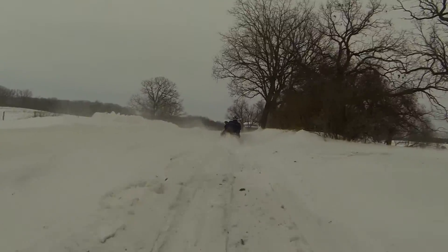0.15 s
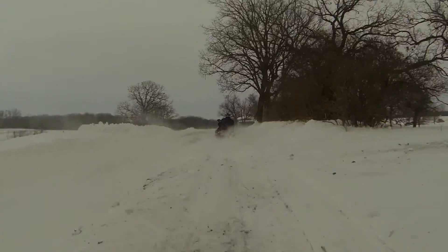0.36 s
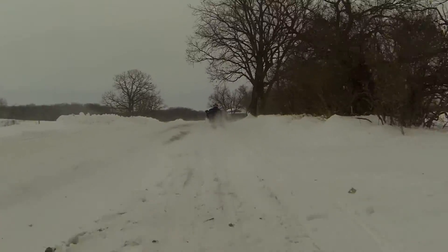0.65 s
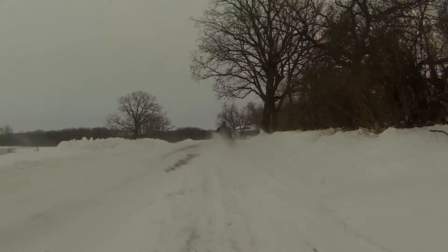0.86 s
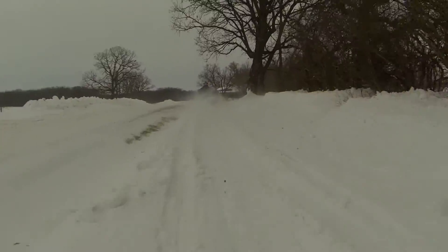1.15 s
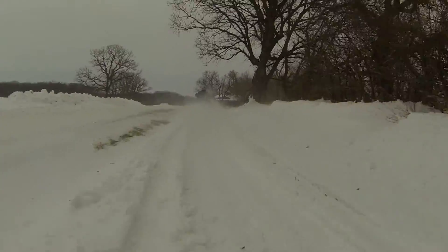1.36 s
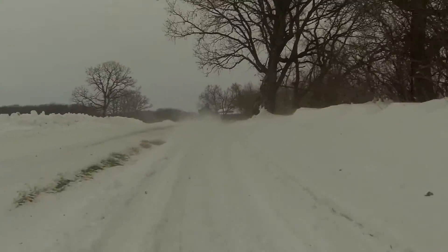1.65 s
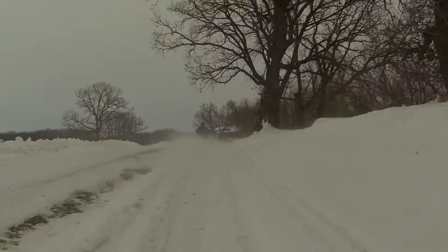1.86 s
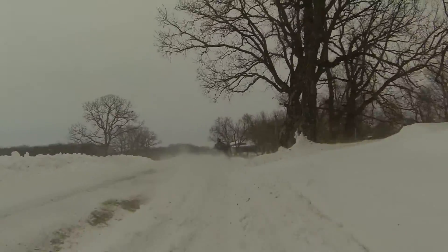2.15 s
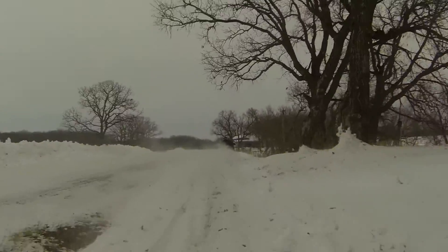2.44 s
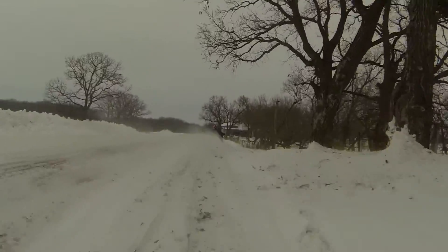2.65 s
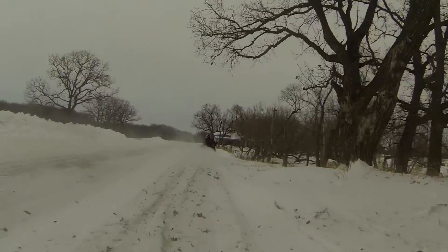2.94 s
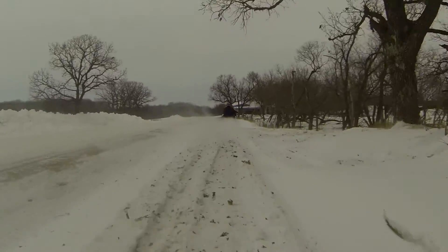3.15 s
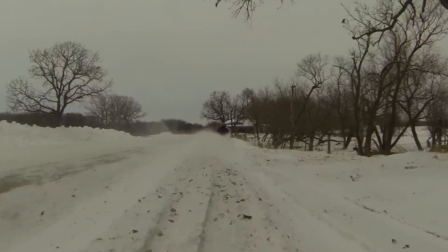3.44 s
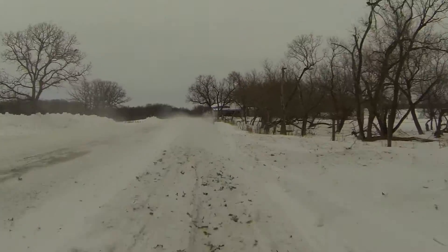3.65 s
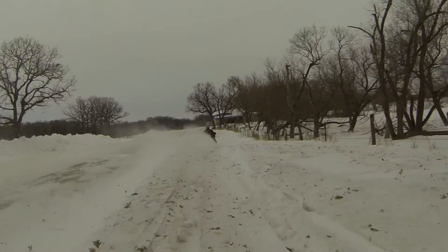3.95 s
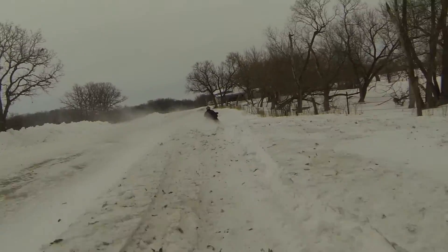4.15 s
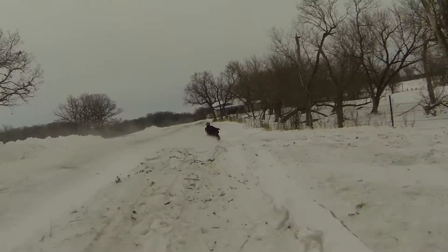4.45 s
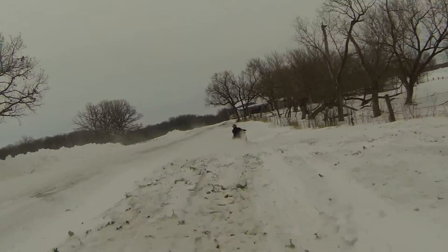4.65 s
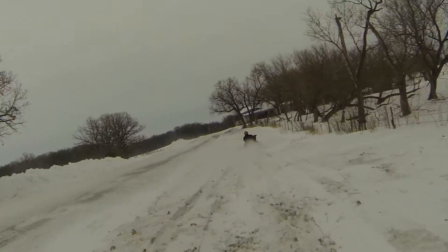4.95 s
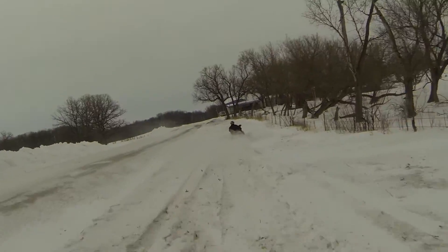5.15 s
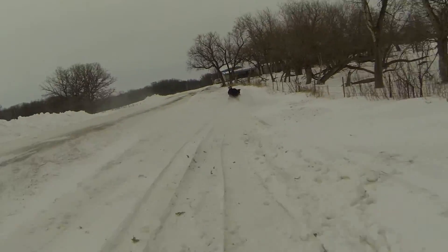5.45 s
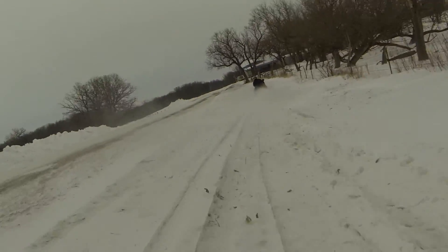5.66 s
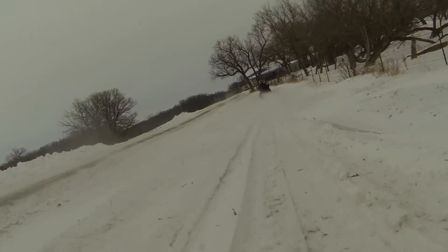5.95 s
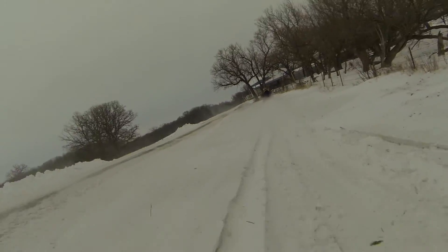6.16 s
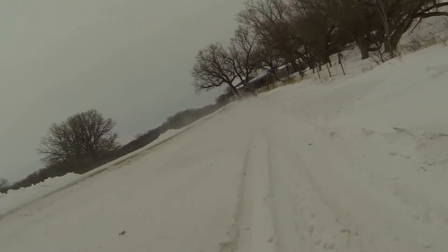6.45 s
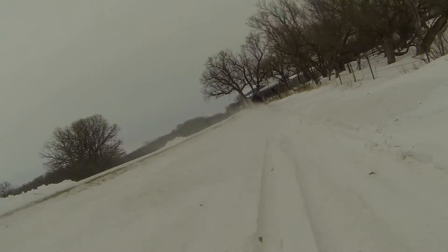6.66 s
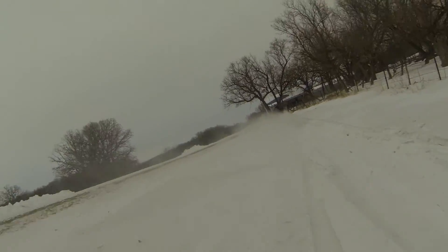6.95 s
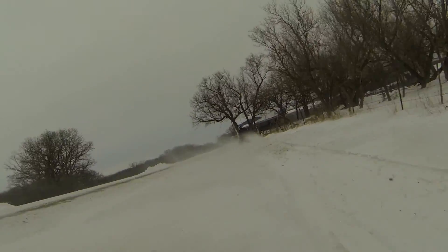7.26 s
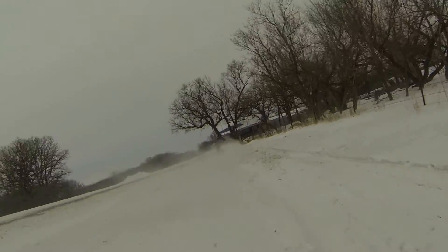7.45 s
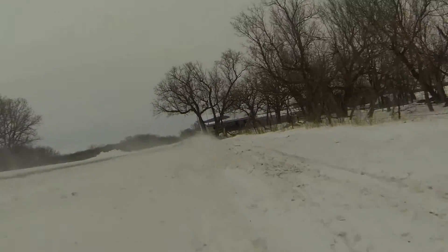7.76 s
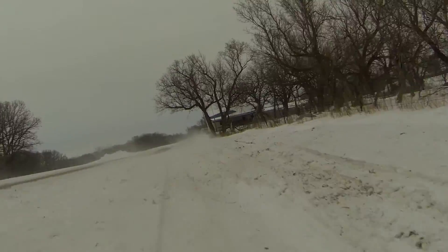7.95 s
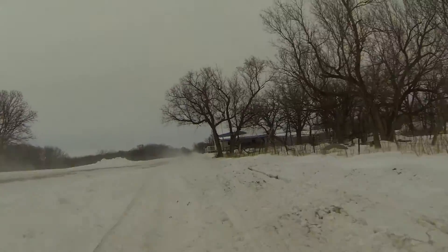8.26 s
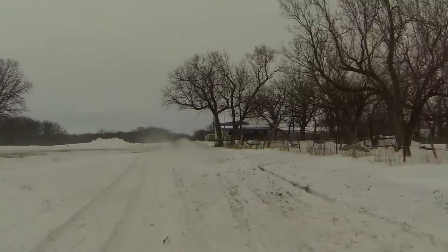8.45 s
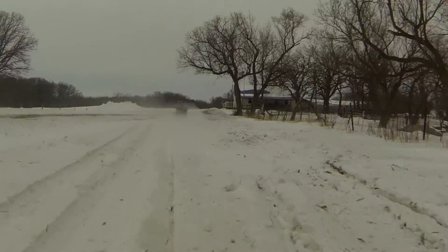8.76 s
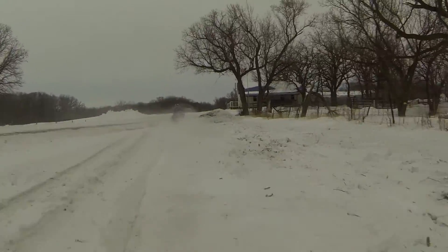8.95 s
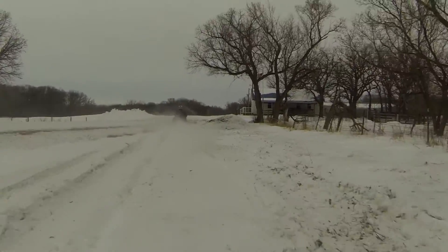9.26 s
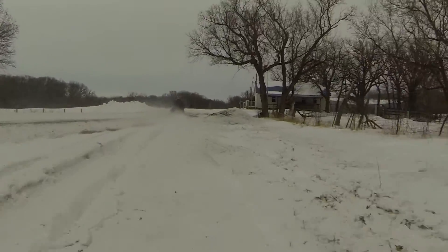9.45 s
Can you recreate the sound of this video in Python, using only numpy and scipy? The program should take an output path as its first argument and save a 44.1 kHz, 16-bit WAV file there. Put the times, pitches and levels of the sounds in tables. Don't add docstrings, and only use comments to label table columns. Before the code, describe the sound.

A fast snowmobile is heard from on board, through a sealed housing that makes everything boxy, nasal and resonant. From 0 s the raspy two-stroke engine is under way, each throttle pull raising its pitch before it settles; pulls near 0.6, 1.6 and 2 s climb progressively higher. Track rumble, spray hiss and a deep swinging throb near 55 Hz run throughout, with a faint low buzz around 1 to 2 s. Dull ski knocks and sharp little latch ticks scatter irregularly, crowded around 4.1 to 4.7 s. The engine sags near 4.8 s, then builds in steps from 5 to 6.5 s. At about 7.1 s rumble thins, and the highest, clearest whining revs hold until 7.8 s amid rapid ticking. It drops quickly by 8.2 s into a weaker, lower growl. From about 8.7 s the roar pulses evenly, five or six surges a second, revving again to the end, cut off while running.

```python
import sys
import numpy as np
from scipy import signal
from scipy.fft import rfft, irfft, next_fast_len
from scipy.io import wavfile
from scipy.ndimage import uniform_filter1d

SR = 44100
rng = np.random.default_rng(int(sys.argv[2]) if len(sys.argv) > 2 else 0)


def output_pcm(signal):
    pcm = np.clip(np.atleast_2d(signal).T, -1, 1) * 32767
    wavfile.write(sys.argv[1], SR, np.round(pcm).astype(np.int16))


def level_to_linear(level):
    exponent = np.asarray(level, float) / 20
    return 10 ** exponent


N = 423801

# lower, upper in turns per s.
TOP_HZ = (114, 124)
# fully sunk, clear of it, in turns per s.
SLOW_HZ = (88, 102)


def engine():
    s = coarse_s()
    speed, pull = crank(s)
    effort_db = load(s) + 23
    turns = np.cumsum(fine(speed) * (1 + .0004 * drift(12))) / SR
    clean_db = 5.5 + 3 * np.maximum(np.tanh(pull / 24), -.3) + .3 * effort_db
    clean_db = clean_db + 4 * np.interp(speed, TOP_HZ, [0, 1])
    shake = frame_shake(turns, speed, effort_db)
    rumble = track_rumble(turns, speed, pull, effort_db, clean_db)
    return shake + rumble + exhaust(turns, speed, pull, effort_db, clean_db)


def exhaust(turns, speed, pull, effort_db, clean_db):
    # frequency in Hz, level in dB per Hz.
    hiss_curve = [(2240, -33), (3800, 1), (4150, -5.5), (4810, -2.5), (5350, -8), (6450, -10),
                  (6960, -12.5), (7970, -10), (9240, -23.5), (13900, -29.3), (14600, -31), (14950, -75)]

    def hiss_at(hz):
        return at_hz(hiss_curve, hz)

    gusts = gusty_noise(turns, gate=0.14, patchy_db=1.0, rate=23)
    drop_db = 6 * np.clip(-pull / 70, 0, 1)
    lines, power = orders(turns, speed, clean_db - drop_db, range(8, 28), cavity_db, waver_db=2.5, smear=.2)
    roar_db = fine(effort_db) - 23
    roar = coloured(gusts, cavity_db) + lines
    roar *= level_to_linear(roar_db) / np.sqrt(band_rms(cavity_db, 1100, 3500) ** 2 + power)

    spray_db = -2.5 * np.tanh(pull / 40)
    hiss_db = fine(-51.5 + .78 * effort_db + .04 * (speed - 95) + spray_db)
    hiss = coloured(gusts, hiss_at) / band_rms(hiss_at, 4200, 9000)
    sizzle = signal.sosfilt(signal.butter(2, 9000, "high", fs=SR, output="sos"), hiss)
    hiss += np.clip(0.07 * (roar_db + 25), -.3, 1) * sizzle
    return roar + level_to_linear(hiss_db) * hiss


def track_rumble(turns, speed, pull, effort_db, clean_db):
    # frequency in Hz, level in dB per Hz.
    rumble_curve = [(12, -29), (20, -11), (43, -9), (69, -3.5), (84, -16), (108, -16.5), (145, -23),
                    (215, -12), (274, -22), (334, -17), (406, -23.5), (471, -33.5), (822, -35.5),
                    (921, -46), (1000, -43.5), (1300, -70.5), (2200, -120)]
    # time in seconds, added rumble in dB.
    grip = [(0, 2.5), (.55, 3.5), (1.0, 0), (1.55, 2), (2.19, -5), (2.36, 4), (3.0, -2.5), (3.9, 1.5),
            (4.15, -1), (4.9, 3), (5.3, -2), (7.04, -3.5), (7.13, -13), (7.8, -7.5), (7.96, 2),
            (8.08, -4.5), (9.1, .5), (9.61, -3)]

    def rumble_at(hz):
        return at_hz(rumble_curve, hz)

    grip_db = in_time(grip)[0]
    slack_db = 5 * np.clip(.5 - pull / 24, 0, 1) * np.interp(speed, SLOW_HZ, [1, .3])
    lines, power = orders(turns, speed, clean_db - slack_db, range(2, 9), rumble_at, waver_db=2.5, smear=.4)
    rumble = coloured(gusty_noise(turns, gate=0.081, patchy_db=1.5, rate=21), rumble_at) + lines
    level_db = fine(-27 + .76 * effort_db) + grip_db
    rumble *= level_to_linear(level_db) / np.sqrt(band_rms(rumble_at, 140, 480) ** 2 + power)
    by_air = signal.sosfiltfilt(signal.butter(2, 450, "high", fs=SR, output="sos"), rumble)
    return rumble - by_air + by_air * level_to_linear(-.5 * grip_db)


def frame_shake(turns, speed, effort_db):
    # centre in seconds, depth in dB, half length in seconds.
    floats = [
        (.76, 4, .15),
        (2.31, 4, .1),
        (4.54, 5, .2),
        (4.91, 5, .1),
        (5.31, 9, .12),
        (7.42, 15, .38),
        (8.2, 18, .27),
        (9.3, 3, .3),
    ]
    # time in seconds, level in dB.
    buzz_curve = [
        (.7, -50),
        (.85, -29),
        (1.75, -28),
        (2.05, -45),
    ]
    first_db = fine(-27 - .36 * (speed - 95) + .2 * effort_db) - dips(floats)
    first_db = first_db + .3 + 3.5 * drift(6)
    first = np.sqrt(2) * level_to_linear(first_db) * np.sin(2 * np.pi * turns + drift(10) / 2)
    buzz_level = np.sqrt(2) * level_to_linear(in_time(buzz_curve)[0] + 2 * drift(10))
    return first + buzz_level * np.sin(2 * np.pi * 176 * np.arange(N) / SR + 1.5 * drift(4))


def orders(turns, crank_hz, throttle_db, numbers, db_at, waver_db, smear):
    loaded_db = [-2, 4, 1, -11, 3, -3, -6, -6, -3, -5, 3, -2, 1, 2, -3, -2, -2, -2, -1, 1, 0, -2, -2, -3,
                 -5, -6]
    top_db = [-17, -2, -6, -14, -4, -10, -3, -5, -9, 4, 4, -10, -2, 7, 6, -6, -5, -5, -6, -12, -7, -5, -11,
              -2, -4, -11]
    top = np.interp(crank_hz, TOP_HZ, [0, 1])
    sunk_db = np.interp(crank_hz, SLOW_HZ, [7, 0])
    out, power = np.zeros(N), 0
    for k in numbers:
        order_db = (1 - top) * loaded_db[k - 2] + top * top_db[k - 2] - (k < 4) * sunk_db
        level = level_to_linear(db_at(k * crank_hz) + order_db + throttle_db) * np.sqrt(30 / SR)
        power = power + level ** 2
        height = fine(np.sqrt(2) * level * level_to_linear(waver_db * coarse_drift(10)))
        out += height * np.sin(2 * np.pi * (k * turns + rng.random()) + smear * drift(5.1))
    return out, fine(power)


def crank(s):
    # opens in seconds, crank turns per s then, eases in seconds,
    # turns per s then, settling time constant in seconds.
    pulls = np.array([(-.3, 70, -.03, 80.5, .2), (.51, 73.4, .79, 89.5, .06), (.93, 85.6, 1.07, 86.7, .3),
                      (1.38, 81.8, 1.45, 83.4, 2), (1.46, 83.8, 1.78, 99.3, 2),
                      (1.98, 106, 2.18, 117.3, .13), (2.42, 100.3, 2.43, 100.2, 3),
                      (2.82, 93, 3.02, 98.5, 2), (3.03, 99, 3.19, 108.6, .06), (3.49, 97, 3.78, 110.2, .28),
                      (4.87, 80.6, 5.17, 97.2, .07), (5.31, 89.3, 5.38, 90, .3), (5.64, 87, 6.08, 105.5, 2),
                      (6.3, 111.2, 6.52, 117.4, .1), (6.8, 104, 6.93, 109.4, 2), (7.24, 126, 7.32, 130, 2),
                      (7.45, 132.9, 7.46, 133, .2), (7.67, 134.3, 7.77, 134.8, .4),
                      (8.25, 97.4, 8.26, 97.2, 3), (9.0, 87.5, 9.41, 100.6, 1), (9.7, 92.5, 10, 100, 1)])
    now = np.searchsorted(pulls[:-1, 0], s) - 1
    opens, low, eases, high, settle = pulls[now].T
    next_s, next_low = pulls[now + 1, :2].T
    settled = np.expm1(-np.maximum(s - eases, 0) / settle) / np.expm1(-(next_s - eases) / settle)
    climbed = np.minimum((s - opens) / (eases - opens), 1)
    speed = low + (high - low) * climbed + (next_low - high) * settled
    flywheel_s = .07
    speed = uniform_filter1d(speed, int(flywheel_s * SR / 40), mode="nearest")
    return speed, np.gradient(speed, s)


def load(s):
    # time in seconds, exhaust roar in dB, seconds to swell 10 dB, seconds to fade 10 dB.
    surges = [(.15, -20, .19, .17), (.35, -25, .3, .4), (.51, -23, .11, .25), (.73, -20.5, .18, .3),
              (1.0, -22, .9, .08), (1.36, -19.5, .24, .07), (1.56, -19, .17, .9), (1.96, -14.5, .9, .33),
              (2.39, -18.5, .9, .32), (2.75, -22.5, .6, .32), (3.06, -15.5, .16, .13),
              (3.24, -17.5, .15, .29), (3.65, -15, .45, .7), (4.025, -19.5, .9, .07), (4.38, -20, .35, .14),
              (4.55, -22.5, .25, .12), (4.68, -18.5, .1, .16), (4.99, -18.5, .25, .15), (5.18, -24, .9, .1),
              (5.39, -25.5, .15, .5), (5.99, -15.5, .3, .14), (6.14, -17, .3, .16), (6.36, -16.5, .3, .9),
              (6.49, -16.5, .9, .09), (6.91, -14.5, .19, .08), (7.05, -20, .4, .22), (7.5, -19, .25, .9),
              (7.95, -20.5, 3, .065), (8.15, -28, .18, .9), (8.42, -24, .16, .4)]
    # first surge in seconds, period in seconds, roar in dB,
    # seconds to swell 10 dB, seconds to fade 10 dB.
    washboard = (8.72, .178, -21.5, .2, .17)
    first, period, *shape = washboard
    steady = [(first + k * period, *shape) for k in range(7)]
    rows = np.array([(-1, -60, 1, 1)] + surges + steady)
    coming = np.searchsorted(rows[:, 0], s)
    was_s, was_db, _, fade = rows[coming - 1].T
    at, db, swell, _ = rows[coming].T
    fading = was_db - 10 * (s - was_s) / fade
    swelling = db - 10 * (at - s) / swell
    return uniform_filter1d(np.maximum(fading, swelling), size=11)


def gusty_noise(turns, gate, patchy_db, rate):
    beat = np.cos(2 * np.pi * turns) + .6 * np.cos(6 * np.pi * turns)
    return rms_one(rng.standard_normal(N) * (1 + gate * beat) * level_to_linear(patchy_db * drift(rate)))


def cavity_db(hz):
    # frequency in Hz, level in dB per Hz.
    roar_curve = [(500, -59.5), (850, -19), (910, -30.5), (1000, -22.5), (1140, -13), (1270, -2.5),
                  (1420, 1.5), (1610, -0.5), (1830, -13.5), (1930, -14), (2320, -8.5), (2690, -15),
                  (3060, -14.5), (3580, -24.5), (4100, -52), (4300, -36.5), (5590, -63), (9460, -120)]
    # frequency in Hz, width in Hz, height in dB.
    resonances = [(1946, 58, 7.5), (2275, 36, 5), (2700, 70, -2), (3492, 43, 8.5)]
    peaks = sum(db / (1 + (2 * (hz - mid) / width) ** 2) for mid, width, db in resonances)
    return at_hz(roar_curve, hz) + peaks


def mount():
    # time in seconds, frequency in Hz.
    swing_hz = [(0, 56), (.9, 55), (1.5, 57), (1.92, 53.5), (2.22, 60), (2.45, 56), (3.15, 52), (3.75, 57),
                (4.05, 52), (4.38, 52), (4.5, 58.4), (4.85, 58), (5.05, 55.8), (6.3, 54.8), (6.7, 51.5),
                (7.15, 53.6), (7.6, 59), (8.2, 56)]
    # time in seconds, level in dB.
    swing_db = [(0, -20), (.4, -17.5), (1.5, -18.5), (2.1, -14.5), (2.9, -15.5), (3.36, -14.5), (3.9, -20),
                (4.05, -12.5), (4.3, -17), (4.74, -11), (5.2, -14), (5.9, -16.5), (6.05, -13), (7.0, -15),
                (7.6, -9.5), (7.95, -14.5), (9.05, -17.5), (9.61, -11)]
    # time in seconds, depth in dB, half length in seconds.
    checks = [(.08, 16, .25), (1.3, 17, .09), (1.66, 7, .15), (2.17, 12, .06), (2.33, 22, .11),
              (2.93, 9, .1), (3.2, 11, .12), (3.61, 13, .18), (4.14, 7, .09), (4.36, 15, .06),
              (4.66, 30, .1), (4.85, 14, .09), (5.97, 16, .06), (6.08, 10, .06), (6.34, 9, .2),
              (6.8, 14, .17), (7.36, 12, .07), (7.47, 14, .06), (7.59, 18, .05), (7.7, 13, .06),
              (7.81, 21, .05), (8.38, 6, .07), (9.4, 12, .08), (9.61, 12, .14)]
    phase = 2 * np.pi * np.cumsum(in_time(swing_hz)[0]) / SR + .6 * drift(3)
    swing = np.sin(phase) + level_to_linear(-35) * np.cos(2 * phase)
    return np.sqrt(2) * level_to_linear(in_time(swing_db)[0] - dips(checks) - .6 + .9 * drift(12)) * swing


def latch():
    # time in seconds, level in dB.
    ticks = [(.322, -43), (.3905, -44), (.6528, -45), (.7814, -42), (1.3785, -43), (1.6677, -38.5),
             (2.0339, -47), (2.0872, -46), (2.5675, -42), (2.6598, -44), (2.7659, -41), (3.2404, -43),
             (4.0903, -47), (4.1686, -40), (4.3022, -41), (4.3517, -39), (4.5601, -40), (4.6404, -42),
             (5.1167, -48), (5.4341, -46), (5.4883, -47), (6.4406, -47), (6.5, -45), (7.4566, -47),
             (8.4243, -44), (8.6267, -48), (8.9151, -43), (9.1849, -42), (9.3107, -46), (9.5327, -42)]
    # first contact in seconds, last in seconds, number of contacts,
    # first level in dB, last level in dB.
    chatter = [(0.9092, 0.9431, 3, -46, -45), (4.1895, 4.2142, 3, -45, -44), (5.5325, 5.5671, 3, -47, -52),
               (6.5716, 6.6091, 3, -53, -55), (7.1094, 7.2558, 9, -55, -54), (7.2737, 7.3427, 5, -60, -53),
               (7.3593, 7.4412, 6, -51, -49), (7.4866, 7.5169, 3, -51, -52), (7.5344, 7.5837, 4, -54, -52),
               (7.6468, 7.68, 3, -57, -52), (7.9218, 7.9844, 5, -43, -47), (8.0012, 8.0698, 5, -53, -53),
               (8.0878, 8.1756, 6, -48, -48), (8.4746, 8.5067, 3, -56, -48), (8.5234, 8.5591, 3, -49, -59),
               (8.872, 8.8946, 2, -43, -45), (8.9382, 8.9586, 3, -42, -53), (9.4112, 9.4501, 3, -39, -44)]
    # time of the first in seconds, delay of the second in seconds, level of
    # the first in dB, level of the second in dB.
    doubles = [(.1334, .0141, -37, -38), (.3367, .0115, -44, -38), (.4024, .0152, -45, -42.5),
               (.4856, .0135, -50, -42), (.5372, .016, -46, -42), (.6766, .0097, -42, -44),
               (.9789, .0167, -43, -43), (1.6893, .0106, -41, -40), (2.4987, .0178, -48, -48),
               (2.8155, .0145, -49, -44), (3.1051, .0213, -41, -46), (4.2705, .0127, -43, -43),
               (4.3724, .0128, -38, -41), (4.407, .0145, -37, -41), (4.5301, .0131, -40, -39),
               (5.0472, .0142, -44, -46), (5.1682, .0195, -45, -48), (7.8897, .0212, -42, -50),
               (8.7158, .022, -48, -47), (8.7919, .0106, -49, -44), (8.9801, .0148, -44, -43),
               (5.3098, .056, -49, -51), (8.3615, .0942, -47, -51), (8.77, .0769, -49, -51),
               (9.2579, .09, -51, -50), (8.1943, .0205, -48, -62), (7.8637, .0472, -48, -56),
               (5.223, .018, -58, -56), (5.276, .022, -50, -55), (5.331, .125, -54, -54),
               (5.512, .092, -57, -53)]
    # time in seconds, level in dB.
    more_ticks = [(.3654, -53), (.6862, -44), (.8751, -54), (1.0431, -55), (1.0985, -50), (1.115, -56),
                  (1.3599, -53), (2.7957, -51), (2.8701, -54), (3.9361, -46), (4.1105, -54), (4.5781, -54),
                  (5.0177, -52), (5.0812, -55), (5.4186, -53), (5.7669, -49), (6.0395, -51), (6.6302, -50),
                  (6.9772, -51), (7.0898, -51), (7.7211, -52), (7.7363, -51), (8.3098, -52), (8.3275, -53),
                  (8.576, -53), (8.608, -49), (8.8132, -51), (9.0316, -53), (9.3291, -50), (9.5991, -41)]
    # frequency in Hz, level in dB,
    # 60 dB decay time in seconds, delay in seconds.
    tick_modes = [(4830, 11, 0.004, -.0003), (5770, 3.5, 0.0048, .0001), (6340, 6.5, 0.0054, .0002),
                  (7950, 2, 0.0043, .0003), (8800, -6, 0.0043, -.0004), (10350, -7, 0.004, -.0004),
                  (13200, -.5, .003, -.0002)]
    runs = [np.linspace((t0, db0), (t1, db1), int(count)) for t0, t1, count, db0, db1 in chatter]
    runs += [[(t, db0), (t + gap, db1)] for t, gap, db0, db1 in doubles]
    s, peak_db = np.vstack([ticks] + runs + [more_ticks]).T
    spread = rng.normal(0, 1.8, (len(s), len(tick_modes)))
    out = np.zeros(N)
    for (hz, db, t60, delay), own_db in zip(tick_modes, spread.T):
        out += struck(s + delay, level_to_linear(peak_db + db + own_db + 3.5), hz, t60)
    return out


def skis():
    # time in seconds, peak level in dB.
    thumps = [(0.055, -15), (0.241, -19), (0.875, -14), (1.003, -15), (1.309, -13), (2.328, -11),
              (3.241, -12), (3.617, -11), (3.94, -13), (4.338, -14), (4.399, -13), (4.549, -17),
              (4.672, -15), (4.847, -15), (4.959, -13), (5.869, -16), (6.308, -17), (6.817, -16),
              (7.929, -15), (8.399, -24), (9.084, -15), (9.279, -18)]
    # frequency in Hz, level in dB, 60 dB decay time in seconds.
    frame_modes = [(125, -11, .07), (175, -8, .06), (235, -9, .06), (340, -12, .05), (400, -16, .04)]
    s, peak_db = np.transpose(thumps)
    spread = rng.normal(0, 3, (len(s), len(frame_modes)))
    knocks = np.zeros(N)
    for k, (hz, db, t60) in enumerate(frame_modes):
        knocks += (-1) ** k * struck(s, level_to_linear(peak_db + db + spread[:, k]), hz, t60)
    return signal.sosfilt(signal.butter(2, 450, fs=SR, output="sos"), knocks)


def struck(s, gains, hz, t60):
    clicks = np.full(N, 1e-18)
    clicks[np.round(s * SR).astype(int)] = gains
    r, w = level_to_linear(-60 / (t60 * SR)), 2 * np.pi * hz / SR
    return signal.lfilter([0, np.sin(w)], [1, -2 * r * np.cos(w), r * r], clicks)


def coloured(x, db_at):
    size = next_fast_len(N)
    hz = np.maximum(np.arange(size // 2 + 1) * SR / size, 1)
    return irfft(rfft(x, size) * level_to_linear(db_at(hz)), size)[:N]


def band_rms(db_at, low_hz, high_hz):
    hz = np.arange(low_hz, high_hz)
    return np.sqrt(np.sum(level_to_linear(db_at(hz)) ** 2) * 2 / SR)


def at_hz(points, hz):
    p = np.array(points)
    return np.interp(np.log(hz), np.log(p[:, 0]), p[:, 1], left=-120, right=-120)


def rms_one(x):
    return x / np.sqrt(np.mean(x ** 2) + 1e-20)


def in_time(rows):
    s, *columns = np.transpose(rows)
    return [np.interp(np.arange(N) / SR, s, c) for c in columns]


def coarse_s():
    return np.arange(N // 40 + 2) * 40 / SR


def fine(coarse):
    return np.interp(np.arange(N) / 40, np.arange(len(coarse)), coarse)


def coarse_drift(rate):
    r = np.exp(-80 * np.pi * rate / SR)
    noise = rng.standard_normal(N // 40 + 2002)
    return rms_one(signal.lfilter([1], [1, -2 * r, r * r], noise)[2000:])


def drift(rate):
    return fine(coarse_drift(rate))


def dips(rows):
    return fine(sum(db * np.maximum(1 - abs(coarse_s() - at) / half, 0) for at, db, half in rows))


def scene():
    return (engine() + mount() + latch() + skis())[None]


def low_pass(x):
    return signal.sosfilt(signal.butter(12, 15730, fs=SR, output="sos"), x)


def record(dry):
    top_cut = signal.cheby2(16, 90, 16500, fs=SR, output="sos")
    bass_cut = signal.butter(2, 24, "high", fs=SR, output="sos")
    rounded = 2 * np.tanh(signal.sosfilt(bass_cut, dry) / 2)
    return low_pass(signal.sosfilt(top_cut, rounded))


dry = scene()
out = record(dry)
output_pcm(out)
```